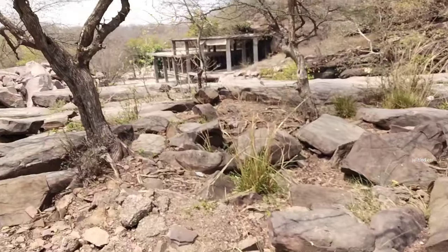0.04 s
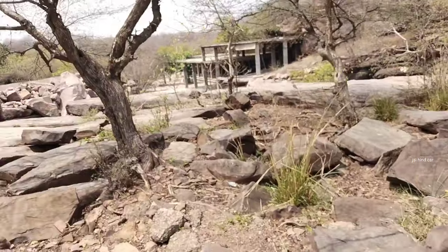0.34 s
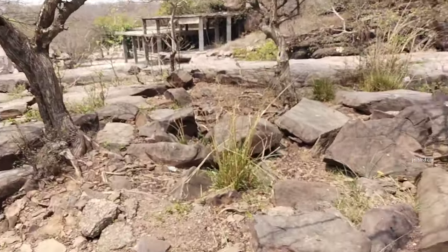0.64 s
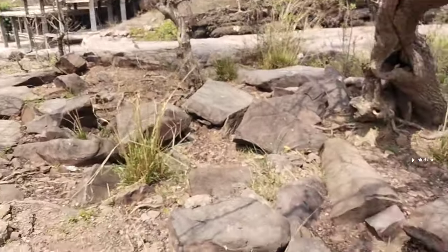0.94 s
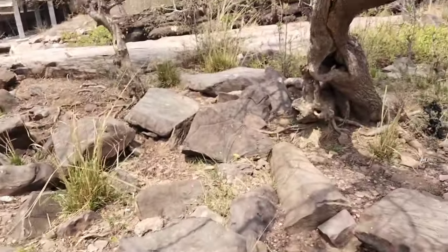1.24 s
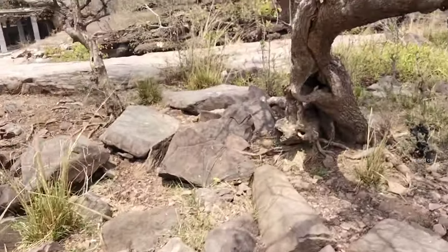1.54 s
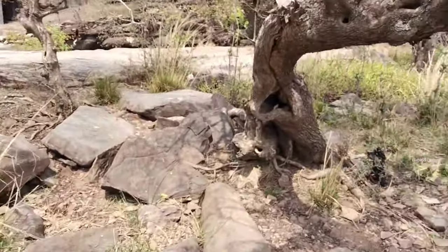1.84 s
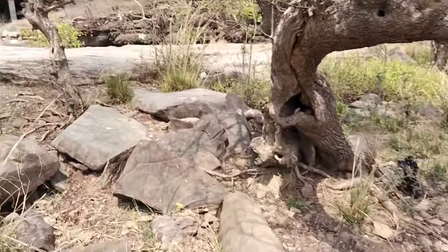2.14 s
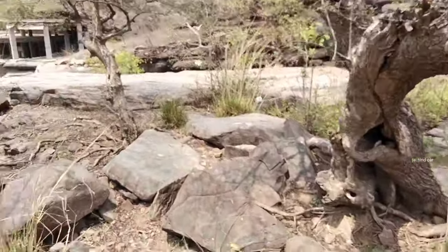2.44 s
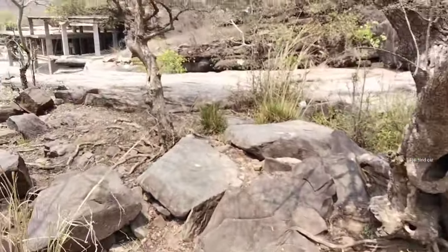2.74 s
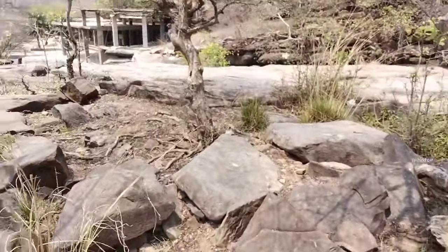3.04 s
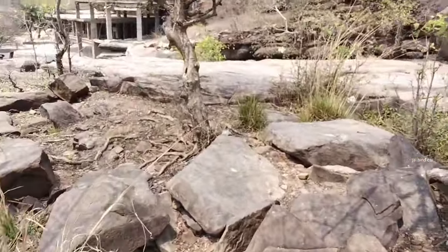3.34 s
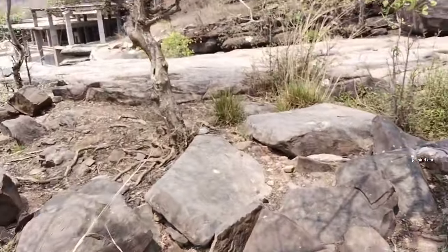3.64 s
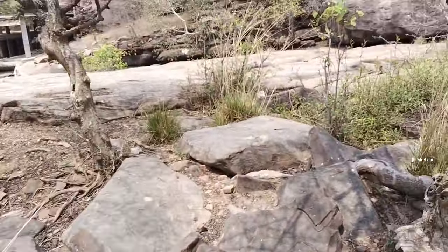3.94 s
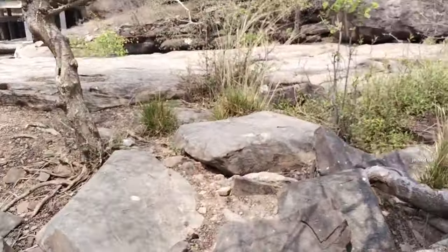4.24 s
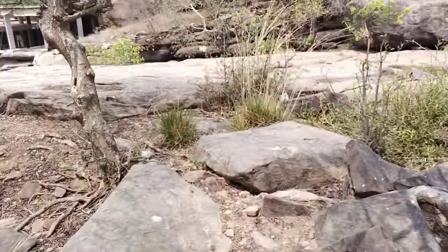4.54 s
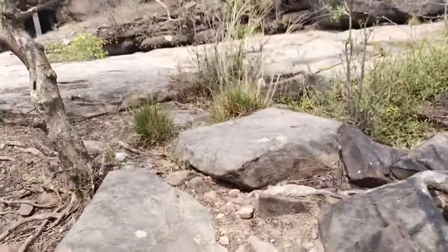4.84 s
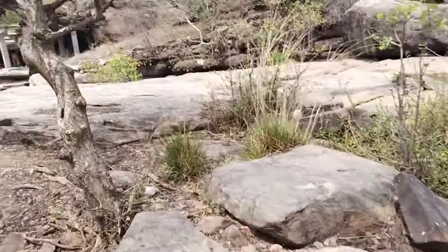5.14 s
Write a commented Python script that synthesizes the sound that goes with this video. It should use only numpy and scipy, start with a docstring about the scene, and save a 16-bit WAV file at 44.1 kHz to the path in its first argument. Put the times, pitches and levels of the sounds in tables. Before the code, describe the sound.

A large bird calls five times on a dry, rocky hillside, each call made of short rasping notes and a longer falling cry. The calls ring briefly through the trees. Small birds chirp and other birds answer hoarsely from far off. Someone steps unevenly over loose stones, grit and dry grass, while low wind rumbles on the microphone, growing stronger in the second half.

```python
"""A large bird calls five times on a dry rocky hillside: short rasping notes, then a long falling one
that clears and cracks. Its voice is a harmonic tone chopped by a slow second vibration.
A rock face throws the calls back and the woodland rings; small birds chirp, others answer from far off.
Someone steps over loose stones, grit and dry grass while wind rumbles on the microphone."""
import sys
import numpy as np
from scipy import signal
from scipy.fft import rfft, irfft, next_fast_len
from scipy.io import wavfile
from scipy.ndimage import uniform_filter1d, map_coordinates

SR = 44100
rng = np.random.default_rng(int(sys.argv[2]) if len(sys.argv) > 2 else 0)


def master_out(mix):
    """Clip the mix to full scale and print it as 16-bit PCM to the path in sys.argv[1]."""
    frames = np.transpose(np.atleast_2d(mix))
    ceiling = np.clip(frames, -1, 1)
    pcm = np.round(ceiling * 32767).astype(np.int16)
    wavfile.write(sys.argv[1], SR, pcm)


N = 237344


def amp(db):
    return 10 ** (np.asarray(db) / 20)


def unit_rms(x):
    return x / np.sqrt(np.mean(x ** 2) + 1e-20)


def along(points, hz):
    """Interpolate (freq_hz, value) points on a log axis."""
    freq_hz, values = np.transpose(points)
    return np.interp(np.log(hz + 1), np.log(freq_hz + 1), values)


def span(start_s, end_s):
    return np.arange(round(start_s * SR), round(end_s * SR)) / SR


def gate(t, rise_s, fall_s):
    ramp = np.minimum((t - t[0]) / rise_s, (t[-1] - t) / fall_s)
    return np.sin(np.pi / 2 * np.clip(ramp, 0, 1)) ** 2


def arch(t, first, middle, last):
    """Parabola through three values over a note."""
    u = np.linspace(-1, 1, len(t))
    return middle + (last - first) / 2 * u + ((first + last) / 2 - middle) * u ** 2


def add(track, start_s, sound):
    part = track[max(round(start_s * SR), 0):][:len(sound)]
    part += sound[:len(part)]


def wobble(knots_per_s, t):
    """Smooth random curve."""
    return map_coordinates(rng.standard_normal(4096), [(t - t[0]) * knots_per_s], mode="mirror")


def filtered(x, response):
    size = next_fast_len(len(x) + 8192)
    return irfft(rfft(x, size) * response(np.fft.rfftfreq(size, 1 / SR)), size)[:len(x)]


def noise(spectrum):
    return unit_rms(filtered(rng.standard_normal(N), lambda hz: amp(along(spectrum, hz))))


def phase_of(hz):
    return 2 * np.pi * np.cumsum(hz) / SR


def scatter(x, t60_s):
    """Trunks and stones scatter a sound into many weak, late copies."""
    t = span(0, 1)
    copies = rng.standard_normal(len(t)) * amp(-60 * t / t60_s)
    return signal.fftconvolve(x, copies / np.linalg.norm(copies))[:N]


GUSTS = [(0.0, -48), (1.05, -59.5), (1.27, -74.5), (2.25, -56.5), (2.28, -44), (2.52, -47), (2.67, -64),
         (2.88, -36.5), (3.24, -42), (3.4, -52), (4.05, -48.5), (4.28, -39), (4.36, -47.5), (4.41, -45),
         (4.47, -53.5), (4.79, -32), (5.02, -44.5), (5.38, -36)]  # time_s, level_db
BUFFETS = [(0.251, -34.5), (0.401, -39), (1.692, -45.5), (3.131, -50), (3.212, -31), (4.28, -37.5),
           (4.409, -32), (4.78, -33), (5.202, -33.5), (5.307, -28)]  # time_s, level_db
RUMBLE_SPECTRUM = [(15, -54), (25, -48), (65, -4), (113, 1.5), (189, -8.5), (226, -14.5), (257, -15),
                   (312, -22), (560, -41.5), (700, -42), (910, -54.5), (1540, -120)]  # freq_hz, density_db


def wind(lump_db=4.5, gust_gain_db=-2, buffet_gain_db=-4, half_thump_s=0.009):
    """Eddies buffet the microphone in lumps; the strongest thump."""
    t = np.arange(N) / SR
    lumps = unit_rms(amp(lump_db * wobble(30, t)))
    breeze = amp(np.interp(t, *np.transpose(GUSTS)) + gust_gain_db) * lumps
    thumps = sum(amp(level_db + buffet_gain_db) * np.exp(-((t - time_s) / half_thump_s) ** 2)
                 for time_s, level_db in BUFFETS)
    pressure = (breeze + thumps) * rng.standard_normal(N)
    return filtered(pressure, lambda hz: unit_rms(amp(along(RUMBLE_SPECTRUM, hz))))


AIR_SPECTRUM = [(100, -14), (400, 1.5), (700, -4), (1200, -1.5), (2100, -5), (3200, -5.5), (5000, -16.5),
                (9000, -19), (12000, -26), (15500, -27.5)]  # freq_hz, density_db


def air(level_db=-65):
    """Even hush of the hillside."""
    return amp(level_db) * noise(AIR_SPECTRUM)


FAR_CALLS = [(0, 0.185, 2081, 1907, -52.5), (0.975, 1.141, 1840, 1507, -51),
             (2.478, 2.697, 2127, 1720, -43.5), (3.224, 3.416, 2186, 1661, -40.5),
             (4.078, 4.287, 1722, 1636, -51), (4.139, 4.359, 2210, 1991, -49.5),
             (4.453, 4.6, 2095, 2053, -43.5), (4.615, 4.8, 1934, 1814, -51),
             (5.226, 5.406, 1876, 2067, -44.5)]  # start_s, end_s, first_hz, last_hz, level_db


def far_birds(jitter=0.094, low_db=-13, high_db=-17, t60_s=0.96):
    """Hoarse calls from across the valley, smeared by the trees."""
    out = np.zeros(N)
    for start_s, end_s, first_hz, last_hz, level_db in FAR_CALLS:
        t = span(start_s, end_s)
        phase = phase_of(np.linspace(first_hz, last_hz, len(t)) * (1 + jitter * wobble(800, t)))
        cry = np.sin(phase) + amp(low_db) * np.sin(phase * 2 / 3) + amp(high_db) * np.sin(phase * 4 / 3)
        add(out, start_s, amp(level_db) * gate(t, 0.0043, 0.08) * cry)
    return scatter(out, t60_s)


SCUFFS = [(0.102, 0.22, -56), (.72, 0.14, -53.5), (0.985, 0.11, -53.5), (2.287, 0.025, -45),
          (2.809, 0.086, -47), (3.295, 0.3, -59), (3.752, 0.033, -50.5)]  # start_s, length_s, level_db
GRIT_SPECTRUM = [(200, 11), (700, 0), (1500, 7), (3000, -17.5), (6000, -12.5), (15000, -25)]  # freq_hz, density_db


def scuffs(grain_db=5):
    """Grit grinds under a sole in uneven grains."""
    force = np.zeros(N)
    for start_s, length_s, level_db in SCUFFS:
        t = span(start_s, start_s + length_s)
        grains = unit_rms(amp(grain_db * wobble(485, t)))
        add(force, start_s, amp(level_db) * gate(t, 0.0037, 0.099) * grains)
    return force * noise(GRIT_SPECTRUM)


STEM_SNAPS = [(0.1101, -54), (0.1553, -40), (0.163, -48.5), (0.1774, -46.5), (0.1966, -43), (0.2637, -49.5),
              (0.9864, -52.5), (3.315, -46.5), (3.766, -37), (3.783, -33.5), (3.792, -49.5),
              (4.6043, -52.5), (4.806, -54), (4.8464, -48), (5.262, -49)]  # start_s, level_db
GRASS_SPECTRUM = [(1500, -10), (4000, -9.5), (8000, 1.5), (11000, -8.5), (15000, -0.5)]  # freq_hz, density_db


def grass(t60_s=0.033, grain_db=4, gain_db=-6):
    """Dry stems bend and snap in clusters of crackle."""
    force, t = np.zeros(N), span(0, .06)
    for start_s, level_db in STEM_SNAPS:
        crackle = amp(level_db + gain_db - 60 * t / t60_s + grain_db * wobble(800, t))
        add(force, start_s, gate(t, 0.0023, .01) * crackle)
    return force * noise(GRASS_SPECTRUM)


STONE_KNOCKS = [(0.13, -40.5, -19), (0.139, -39.5, -12), (0.178, -31.5, -2), (0.253, -39.5, -15.5),
                (0.739, -31.5, -19), (0.746, -40.5, 13), (0.837, -38, -3), (0.998, -36.5, -15),
                (1.475, -38, 1), (2.304, -37, 8), (2.324, -35, -2.5), (3.396, -38.5, 8), (3.426, -23, -13),
                (4.054, -41, 1.5), (4.677, -33.5, -9.5), (4.885, -39, -10), (5.263, -20, -17)]  # start_s, knock_peak_db, clack_offset_db
STONE_MODES = [(370, 450, 3), (557, 217, 8.5), (767, 230, 4.5), (1046, 420, 2), (1410, 50, 5.5),
               (2380, 1000, -11.5), (2900, 250, -13)]  # centre_hz, width_hz, gain_db


def stones(knock_lowpass_hz=4000, clack_gain_db=-4, clack_t60_s=0.11):
    """Loose stones rock together underfoot: a dull knock and a gritty clack."""
    def body(hz):
        modes = sum((-1) ** k * amp(gain_db) * 1j * hz * width_hz
                    / (centre_hz ** 2 - hz ** 2 + 1j * hz * width_hz)
                    for k, (centre_hz, width_hz, gain_db) in enumerate(STONE_MODES))
        return modes / (1 + 1j * hz / knock_lowpass_hz) ** 2

    out, t = np.zeros(N), span(0, .1)
    clack_band = signal.butter(3, [1100, 2800], "band", fs=SR, output="sos")
    for start_s, knock_peak_db, clack_offset_db in STONE_KNOCKS:
        blow = signal.unit_impulse(len(t)) + .05 * rng.standard_normal(len(t)) * amp(-60 * t / .04)
        knock = filtered(blow, body)
        knock /= np.abs(knock).max()
        clack = signal.sosfilt(clack_band, rng.standard_normal(len(t))) * amp(-60 * t / clack_t60_s)
        clack *= amp(clack_offset_db + clack_gain_db) / np.abs(clack).max()
        add(out, start_s, amp(knock_peak_db) * (knock + clack))
    return out


CHIRPS = [(0.222, 0.26, 2390, 2970, 2400, .01, -51), (0.362, 0.408, 7440, 5300, 6300, 0.061, -52.5),
          (0.704, 0.783, 3900, 3390, 2500, 0.14, -46.5), (0.789, 0.844, 6460, 6600, 7020, 0.032, -60),
          (.86, 0.989, 4360, 5100, 5900, 0.0074, -53.5), (1.263, 1.293, 5560, 6920, 7700, 0.043, -59.5),
          (1.278, 1.334, 4140, 5460, 5250, 0.0093, -57), (1.335, 1.454, 3780, 4770, 5560, 0.0082, -47),
          (1.612, 1.722, 3890, 4600, 5400, 0.014, -46), (4.235, 4.274, 5320, 4230, 3260, 0.084, -59),
          (4.485, 4.544, 7030, 6350, 6100, 0.061, -65.5), (4.855, 4.901, 2600, 2830, 2840, 0.036, -58.5),
          (4.961, 5.006, 3700, 5100, 3700, 0.075, -56.5), (5.011, 5.069, 4170, 3410, 3040, 0.085, -50),
          (5.089, 5.126, 2630, 2940, 2880, .02, -55.5)]  # start_s, end_s, first_hz, middle_hz, last_hz, warble_ratio, level_db


def small_birds(warble_per_s=110, jitter=0.45, octave_db=-27, scattered_db=-6):
    """Thin gliding whistles from inside the scrub."""
    out = np.zeros(N)
    for start_s, end_s, first_hz, middle_hz, last_hz, warble_ratio, level_db in CHIRPS:
        t = span(start_s, end_s)
        waver = warble_ratio * (wobble(warble_per_s, t) + jitter * wobble(905, t))
        phase = phase_of(arch(t, first_hz, middle_hz, last_hz) * (1 + waver))
        whistle = np.sin(phase) + amp(octave_db) * np.sin(2 * phase)
        add(out, start_s, amp(level_db) * gate(t, 0.0079, 0.0018) * whistle)
    return out + amp(scattered_db) * scatter(out, t60_s=.16)


# start_s, end_s, first_hz, middle_hz, last_hz, throb_hz, throb_depth, roughness,
# h2_first_db, h2_middle_db, h2_last_db, fundamental_db, overtones_db (h2: second harmonic)
SHORT_NOTES = [(0.296, 0.307, 1160, 1118, 1150, 61, 0, 0.02, -27, -28.5, -38.5, -51, -49.5),
               (0.312, 0.334, 1153, 1136, 1063, 60, 0, 0.08, -27, -28, -32, -53, -50),
               (.406, 0.494, 1189, 1199, 1175, 59.3, 0.92, 0.75, -36, -36, -29.5, -61, -45),
               (1.345, 1.403, 1166, 1236, 1304, 59.4, 0.82, 1, -34.5, -36, -38, -44, -43),
               (1.456, 1.609, 1202, 1271, 1289, 71.1, 1, 0.42, -36, -24, -32.5, -37, -37),
               (2.077, 2.146, 1217, 1304, 1347, 67.2, 0.6, 0.4, -25.5, -25.5, -32.5, -41.5, -36),
               (2.145, 2.177, 1343, 1329, 1255, 70, 0.93, 0.63, -23.5, -22, -27, -43.5, -34.5),
               (2.77, 2.854, 1279, 1292, 1259, 65.6, 0.65, 0.64, -37, -32.5, -28, -45, -40.5),
               (3.506, 3.672, 1227, 1283, 1217, 70.3, 0.63, 0.9, -39, -35, -37.5, -48, -45)]


def yelps(hoarse_db=-19.5):
    """Voice controls for short notes: pitch and level bow, roughness holds."""
    for (start_s, end_s, first_hz, middle_hz, last_hz, throb_hz, throb_depth, roughness,
         *h2_db, fundamental_db, overtones_db) in SHORT_NOTES:
        t = span(start_s, end_s)
        yield (t, arch(t, first_hz, middle_hz, last_hz), throb_hz, throb_depth, roughness,
               arch(t, *h2_db), fundamental_db, overtones_db, hoarse_db)


# start_s, end_s, top_hz, throb_hz, throb_depth, clear_at_s,
# h2_first_db, h2_middle_db, h2_last_db, fundamental_db, overtones_db, loss_db_per_semitone
LONG_NOTES = [(.554, .797, 1231, 72.2, 0.76, 0.751, -43, -34, -25, -53.5, -49.5, 3.5),
              (1.689, 1.908, 1297, 70, 0.51, 1.86, -34.5, -32.5, -23.5, -46.5, -39, 4),
              (2.249, 2.464, 1250, 67.2, 0.82, 2.42, -31.5, -32.5, -27.5, -50, -43.5, 5.5),
              (2.92, 3.225, 1268, 67.24, 0.88, 3.13, -36, -37.5, -36, -47, -42.5, 3.5),
              (3.758, 4.017, 1224, 71.65, 0.36, 4.21, -38.5, -39.5, -31.5, -51.5, -50, 3)]
WAIL_TUNE = [(0, -0.82), (.2, 0), (0.449, -1.04), (0.659, -2), (.83, -3), (0.999, -1.7)]  # length_fraction, offset_semitones


def wails(clearing_s=0.034, fundamental_db_per_semitone=1.2, hoarse_db=-14):
    """Voice controls for long notes: purer as they sag, lifting at the end; most lose their throb."""
    for (start_s, end_s, top_hz, throb_hz, throb_depth, clear_at_s,
         *h2_db, fundamental_db, overtones_db, loss_db_per_semitone) in LONG_NOTES:
        t = span(start_s, end_s)
        tune = np.interp(np.linspace(0, 1, len(t)), *np.transpose(WAIL_TUNE))
        sag_semitones = uniform_filter1d(tune, size=len(t) // 10)
        roughness = np.clip((clear_at_s - t) / clearing_s, 0, 1)
        yield (t, top_hz * 2 ** (sag_semitones / 12), throb_hz, throb_depth, roughness, arch(t, *h2_db),
               fundamental_db + fundamental_db_per_semitone * sag_semitones,
               overtones_db + loss_db_per_semitone * sag_semitones, hoarse_db)


THROAT_RESPONSE = [(3200, 4.5), (3800, -11.5), (4300, -10.5), (5000, -6.5), (5600, -25), (6400, -12.5),
                   (7600, -17), (8700, -31.5), (10200, -38), (11500, -36.5), (15000, -36)]  # freq_hz, gain_db
SYRINX_NOISE = [(600, -27), (1300, 12), (1900, 9.5), (2700, 21.5), (3400, 7), (4400, -22.5), (7800, -7.5),
                (9500, -23), (15000, -30.5)]  # freq_hz, density_db
VOICE_TREBLE = [(.5, 7.5), (1.55, 2.5), (2.2, -4), (3, -6.5), (3.7, -5)]  # time_s, gain_db


def large_bird(swing=0.016, jitter=.011, throb_drift=0.035, rasp=0.091, flutter_db=2.0):
    """Harmonic voice, carried by its second harmonic and chopped by a slow second vibration."""
    out = np.zeros(N)
    hiss = noise(SYRINX_NOISE)
    for (t, pitch_hz, throb_hz, throb_depth, roughness,
         h2_db, fundamental_db, overtones_db, hoarse_db) in [*yelps(), *wails()]:
        low_db, high_db = fundamental_db - h2_db, overtones_db - h2_db
        treble_db = np.interp(t, *np.transpose(VOICE_TREBLE))
        throb_phase = phase_of(throb_hz * (1 + throb_drift * wobble(60, t)))
        chop = throb_depth * np.sqrt(roughness)
        pulse = 1 - chop + chop * np.abs(np.sin(throb_phase / 2 + .2)) ** 1.6
        pulse /= np.sqrt((1 - chop / 2) ** 2 + chop ** 2 / 8)  # near-constant power
        # tension sags within each throb, swinging the pitch
        bend = swing * roughness * np.sin(throb_phase) + jitter * (.15 + roughness) * wobble(450, t)
        phase = phase_of(pitch_hz * (1 + bend))
        fundamental = amp(low_db) * np.sin(phase) / np.sqrt(pulse + 0.48)  # throbs less
        voice = np.sin(2 * phase) + fundamental
        for k in range(3, 13):
            treble_share = np.clip((k * pitch_hz - 7500) / 2500, 0, 1)
            partial_db = high_db + along(THROAT_RESPONSE, k * pitch_hz) + treble_db * treble_share
            strength = amp(partial_db + flutter_db * wobble(130, t))
            partial = np.sin(k * phase + 0.14 * roughness * wobble(260, t))
            voice += strength * partial * (1 + 2 * rasp * wobble(1300, t))
        voice *= 1 + rasp * (0.063 + roughness) * wobble(1500, t)
        # more air tears through a harder-forced voice
        breath_gain = amp(hoarse_db + (high_db + 12) / 2) * (.2 + roughness)
        voice += breath_gain * hiss[round(t[0] * SR):][:len(t)]
        add(out, t[0], np.sqrt(2) * amp(h2_db) * pulse * voice * gate(t, 0.0061, 0.0014))
    return out


ROCK_REFLECTION = [(1200, -11.5), (2400, -13), (3700, -25), (5000, -7), (7500, -3), (10000, -3),
                   (15000, -9.5)]  # freq_hz, gain_db
WOODS_DECAY = [(300, .4), (1200, 0.93), (2300, 0.86), (5000, 0.54), (8000, 0.92), (14000, .4)]  # freq_hz, t60_s
WOODS_RESPONSE = [(300, -13), (1200, -10.5), (2300, -12.5), (3400, -1.5), (5000, -2.5), (7300, -4),
                  (10000, -6.5)]  # freq_hz, gain_db


def hillside(x, ground_s=0.00232, ground_db=-17, rock_s=0.053, second_s=0.19, second_db=-9):
    """Direct sound, one bounce off the ground, two off the rock face, a diffuse tail from the trees."""
    def bounces(hz):
        delay = lambda delay_s: np.exp(-2j * np.pi * hz * delay_s)
        rock = amp(along(ROCK_REFLECTION, hz)) * (delay(rock_s) + amp(second_db) * delay(second_s))
        return rock + amp(ground_db) * delay(ground_s)

    hz, t, noise_bands = signal.stft(rng.standard_normal(2 * SR), SR, nperseg=256)
    build_up = (1 - np.exp(-t / 0.0073)) ** 2
    envelope = build_up * amp(-60 * t / along(WOODS_DECAY, hz)[:, None])
    band_energy = 2 * SR * np.mean(envelope ** 2, axis=1, keepdims=True)
    envelope *= amp(along(WOODS_RESPONSE, hz))[:, None] / np.sqrt(band_energy)
    tail = signal.istft(noise_bands * envelope, SR, nperseg=256)[1]
    return x + filtered(x, bounces) + signal.fftconvolve(x, tail)[:N]


VOICE_CRACKS = [(.797, 1477, -46), (1.907, 1536, -40), (2.461, 1523, -40), (4.014, 1557, -47)]  # start_s, pitch_hz, level_db


def voice_cracks(length_s=0.031, jitter=0.038):
    """The voice flips to a higher, hoarse register as a long note ends."""
    out = np.zeros(N)
    for start_s, pitch_hz, level_db in VOICE_CRACKS:
        t = span(start_s, start_s + length_s)
        phase = phase_of(pitch_hz * (1 + jitter * wobble(760, t)))
        tone = np.sin(phase) + np.sin(2 * phase) + 0.36 * np.sin(3 * phase)
        add(out, start_s, amp(level_db) * gate(t, 0.0045, 0.01) * tone)
    return out


def scene():
    birds = hillside(large_bird() + voice_cracks()) + small_birds() + far_birds()
    footsteps = stones() + scuffs() + grass()
    return (birds + footsteps + wind() + air())[None]


def record(dry):
    """Brick-wall low-pass."""
    cutoff_hz = 15720
    return np.array([filtered(channel, lambda hz: hz < cutoff_hz) for channel in dry])


dry = scene()
out = record(dry)
master_out(out)
```